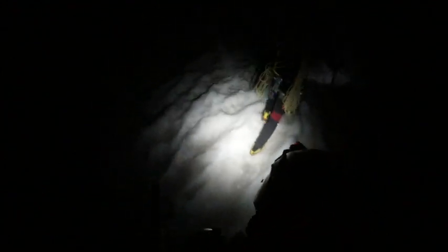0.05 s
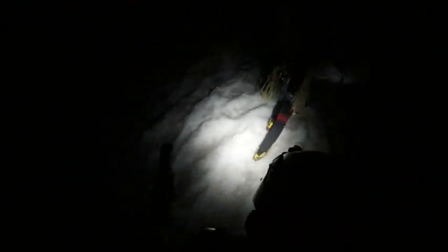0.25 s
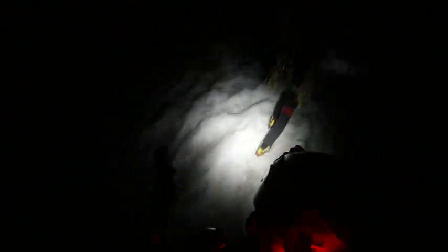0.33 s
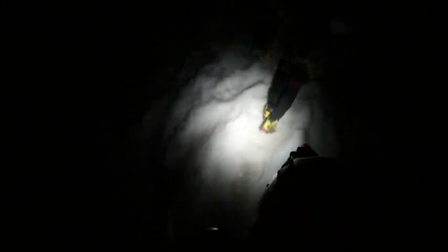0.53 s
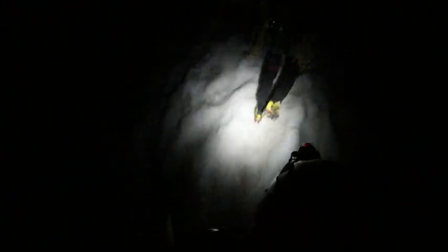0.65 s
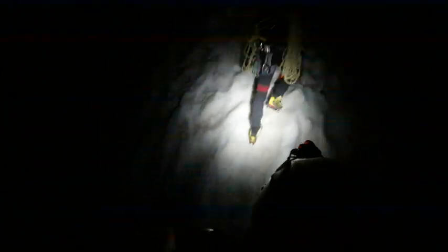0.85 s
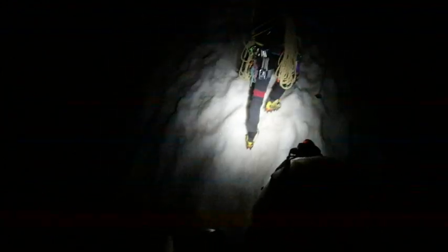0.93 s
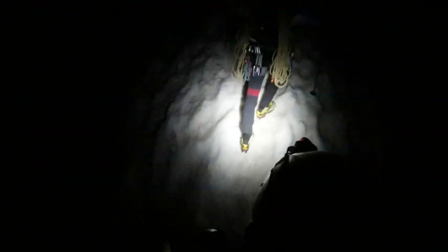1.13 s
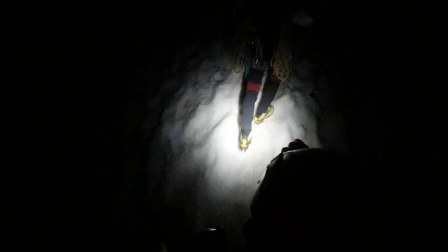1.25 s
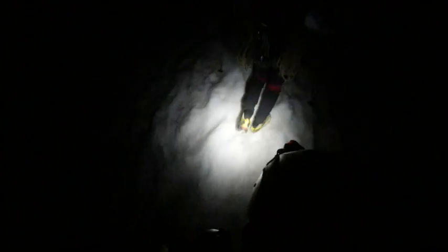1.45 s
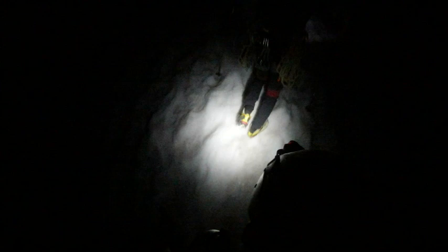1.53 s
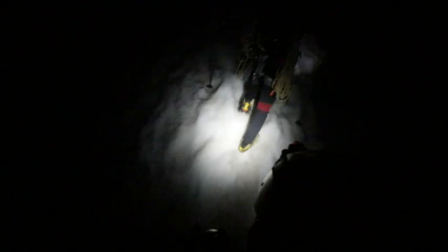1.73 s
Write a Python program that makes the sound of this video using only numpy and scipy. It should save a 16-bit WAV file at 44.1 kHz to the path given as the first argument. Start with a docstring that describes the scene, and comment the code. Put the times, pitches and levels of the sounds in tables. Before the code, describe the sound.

Spiked boots crunch into firm, crusty snow in uneven bursts, with low wind thumps on the microphone

```python
"""On a snow slope at night, spiked boots crunch into firm snow close below a small two-port microphone.
Crunches are bursts of random grain breaks in four sizes, each exciting resonances of its own.
Crust cracks, sole knocks, ice ticks and a stick-slip creak are short rings with noise splinters.
Metal gear clinks on decaying modes, and a thin squeak is a gliding tone roughened by noise. Low thumps,
mostly wind and a few thuds of snow, are short swings with rumble at each port; still air is shaped noise."""
import sys
import numpy as np
from scipy import signal
from scipy.fft import rfft, irfft
from scipy.io import wavfile
from scipy.ndimage import uniform_filter1d, map_coordinates

SR = 44100
rng = np.random.default_rng(int(sys.argv[2]) if len(sys.argv) > 2 else 0)


def digitize_waveform(pressure):
    """Quantize a signal to 16-bit integers and store it at the path in sys.argv[1].

    Rows of a 2-D input are taken as channels; values are limited to [-1, 1].
    """
    field = np.atleast_2d(pressure).T
    bounded = np.clip(field, -1, 1)
    quanta = np.round(bounded * 32767).astype(np.int16)
    wavfile.write(sys.argv[1], SR, quanta)


N = 79380


def undb(db):
    """Logarithmic level: decibels to amplitude gain."""
    return 10 ** (np.asarray(db) / 20)


def unit(x):
    """Normalization: scale to rms 1."""
    return x / np.sqrt(np.mean(x ** 2))


def ring(x, hz, width_hz):
    """Resonance: a band-pass whose Q is centre frequency over bandwidth."""
    b, a = signal.iirpeak(min(hz, 0.45 * SR), hz / width_hz, fs=SR)
    return signal.lfilter(b, a, x)


def add(out, at_s, wave, pan_db=0, lag=0):
    """Interaural-style cues: place a sound by level difference (L-R) and right-port lag in samples."""
    for channel, sign in enumerate((1, -1)):
        start = max(int(at_s * SR - sign * lag / 2), 0)
        out[channel, start:start + len(wave)] += wave[:N - start] * undb(sign * pan_db / 2)


# spectrum of the air noise: (frequency [Hz], relative density level [dB per Hz])
AIR_SPECTRUM = [(15, -42), (25, 22.5), (64, -3.5), (129, -2.5), (433, -4), (826, -6), (2300, -14.5),
                (5280, -26.5), (12800, -35), (15500, -51)]
AIR_DB = -56.5  # rms ahead of the microphone's low cut


def air():
    """Partial coherence: still mountain air is shaped noise, less alike left and right in the treble."""
    hz = np.fft.rfftfreq(N, 1 / SR).clip(1)
    knot_hz, knot_db = np.array(AIR_SPECTRUM).T
    gain = undb(np.interp(np.log(hz), np.log(knot_hz), knot_db))
    mid, side = rfft(rng.standard_normal((2, N))) * gain
    wide = np.clip(hz / 2500, 0.3, 1)
    stereo = irfft(np.array([mid + wide * side, mid - wide * side]), N)
    return undb(AIR_DB) * unit(stereo)


THUMP_SAG = 0.18  # fall in pitch across a thump, as a fraction of its centre frequency
THUMP_EDGE = 0.13  # octave overtone, relative amplitude
THUMP_SPREAD_RAD = 0.63  # random scatter of phase
RUMBLE_DB, RUMBLE_HZ = -15, 74  # level relative to the thump, centre of the band
RUMBLE_S = 0.029  # time for the trailing rumble's power to fall by a factor e
# low thumps at each port: mostly wind; the right-port ones above 190 Hz are low crunch thuds of the snow.
# Length is the full width at about 61 % of the envelope's peak:
# (centre time [s], peak level [dB], frequency at centre [Hz], length [ms])
LEFT_PORT_THUMPS = [(0.19, -37, 88, 15.5), (0.214, -13, 180, 3.7), (0.235, -19, 94, 9.9),
                    (0.251, -20.5, 119, 3.8), (0.268, -25, 74, 5.9), (0.278, -19.5, 133, 7.1),
                    (0.304, -16.5, 90, 19), (0.321, -22.5, 83.6, 13), (0.352, -24.5, 167, 8.4),
                    (0.38, -18.5, 103, 3), (0.4, -31.5, 91, 15), (0.413, -22, 87, 9),
                    (0.423, -14.5, 106, 2.8), (0.442, -16.5, 168, 13), (0.477, -15, 129, 12.6),
                    (0.488, -17, 133.4, 17.5), (0.521, -15, 162, 8.2), (0.533, -14.5, 168, 10.5),
                    (0.546, -22.5, 171, 13), (0.56, -35, 153, 8), (0.612, -30, 145, 3.8),
                    (0.63, -31.5, 117, 5.8), (0.643, -39, 89, 7.4), (0.693, -40, 71, 13),
                    (0.722, -34.5, 100, 7.4), (0.753, -38, 75, 6.9), (0.776, -37, 93, 8.7),
                    (0.815, -37, 106, 6.9), (0.833, -37, 76, 7.9), (0.92, -50, 95, 38),
                    (1.001, -42.5, 81, 25), (1.036, -30.5, 112, 11.3), (1.056, -31, 105.6, 10),
                    (1.088, -38, 122, 37), (1.101, -30.5, 108, 7), (1.112, -28.5, 130, 14),
                    (1.136, -36.5, 118, 14), (1.151, -35.5, 77.5, 16), (1.165, -34, 105, 6.2),
                    (1.184, -33.5, 75, 7.1), (1.197, -32, 109, 19), (1.211, -31.5, 97, 6.7),
                    (1.304, -43, 93, 8.9), (1.324, -39.5, 130, 15), (1.37, -44, 110, 48),
                    (1.472, -41.5, 118, 8.4), (1.496, -36.5, 117, 12), (1.544, -39.5, 71, 14)]
RIGHT_PORT_THUMPS = [(0.26, -43, 161, 12), (0.328, -34, 93, 14), (0.4, -20.5, 135, 3.9),
                     (0.441, -25, 97, 5.1), (0.467, -40, 150, 20), (0.5, -29.5, 54, 5.3),
                     (0.517, -25, 227, 2.9), (0.529, -36, 196, 11), (0.552, -39, 230, 6),
                     (0.588, -38, 198, 4.6), (0.653, -37.5, 80, 65), (0.731, -42.5, 86, 11),
                     (0.786, -42, 67, 20), (0.813, -38.5, 70.5, 14), (0.842, -46.5, 67.4, 59),
                     (1.325, -43.5, 168, 10), (1.434, -39, 140, 3.5), (1.497, -42, 79, 21),
                     (1.545, -39, 57.5, 30), (1.587, -47, 58, 30)]


def low_thumps(table):
    """Pressure pulses at one port: each thump pushes, then sucks, sagging in pitch with rumble behind."""
    t, thumps, power = np.arange(N) / SR, 0, 0
    for (at, db, hz, ms), scatter in zip(table, rng.standard_normal(len(table))):
        since = t - at
        half = ms / 1400  # s from the centre to 1/e of the peak
        sag = 1 - THUMP_SAG * np.tanh(since / half) / 2
        phase = 2 * np.pi * hz * since * sag + THUMP_SPREAD_RAD * scatter
        swings = np.sin(phase) + THUMP_EDGE * np.cos(2 * phase)
        thumps = thumps - undb(db) * np.exp(-(since / half) ** 2) * swings
        fade = np.where(since < 0, half, RUMBLE_S)
        power = power + undb(2 * db) * np.exp(-(since / fade) ** 2)
    noise = rng.standard_normal(N)
    rumble = unit(ring(ring(noise, RUMBLE_HZ, 102), RUMBLE_HZ, 156))
    return thumps + undb(RUMBLE_DB) * np.sqrt(power) * rumble


def mode(hz, db, t60):
    """Modal decay: a sine that falls 60 dB in t60 seconds."""
    t = np.arange(6000) / SR
    return undb(db - 60 * t / t60) * np.sin(2 * np.pi * hz * t)


# modes of two pieces of metal gear: (frequency [Hz], relative level [dB], t60 [s])
BUCKLE_MODES = [(7020, 0, 0.027), (10420, -1.5, 0.04), (12530, -18, 0.079), (14940, -18, .09)]
SPIKE_MODES = [(5100, -8, 0.028), (7800, -10, .02), (9400, 2, 0.014), (14400, -15, .05)]
# blows on each piece: (time [s], level [dB])
BUCKLE_BLOWS = [(.266, -38.5), (0.271, -40.5)]
SPIKE_BLOWS = [(1.2841, -35.5)]
# small pings of gear: (time [s], level [dB], frequency [Hz], t60 [s])
GEAR_PINGS = [(1.455, -51, 3670, 0.085)]


def metal():
    """Modal superposition: a blow on the gear starts all modes of the piece together."""
    out = np.zeros((2, N))
    for modes, blows in ((BUCKLE_MODES, BUCKLE_BLOWS), (SPIKE_MODES, SPIKE_BLOWS)):
        clink = sum(mode(*m) for m in modes)
        for at, db in blows:
            add(out, at, undb(db) * clink, 0, 1)
    for at, db, hz, t60 in GEAR_PINGS:
        add(out, at, mode(hz, db, t60), 1, 2)
    return out


# glide of a thin snow squeak: (time [s], frequency [Hz], rms level of the roughness [dB])
SQUEAK_GLIDE = [(1.325, 6500, -80), (1.33, 6430, -53.5), (1.355, 6630, -53), (1.385, 7200, -59),
                (1.4, 7150, -80)]


def squeak():
    """Amplitude modulation: low-frequency noise multiplies a gliding sine and makes it rough."""
    t = np.arange(N) / SR
    at, hz, db = np.array(SQUEAK_GLIDE).T
    rough = unit(ring(rng.standard_normal(N), 28, 90))
    tone = np.sin(2 * np.pi * np.cumsum(np.interp(t, at, hz)) / SR)
    return undb(np.interp(t, at, db, -140, -140)) * rough * tone


LAG_PER_DB = 1.23  # samples of right-port lag per dB of L-R
SNAP_DIP_RAD = 1.35  # a snap dips briefly before its first peak
SPLINTER_S = 0.0037  # splinter noise falls by a factor e
# splinter peak relative to the ring's envelope peak, dB
CRACK_SPLINTER_DB, KNOCK_SPLINTER_DB, TICK_SPLINTER_DB = -20, -15.5, -11.5


def snaps(table, splinter_db):
    """Damped oscillation: short rings swell and fade within a few cycles, with a burst of splinters."""
    out, t = np.zeros((2, N)), np.arange(1200) / SR
    noises = rng.standard_normal((len(table), len(t)))
    for (at, db, hz, pan_db, cycles), noise in zip(table, noises):
        swell = 1 - np.exp(-t * hz * 4.7 / max(cycles, 1))
        env = swell * np.exp(-t * hz / max(cycles, 0.3))
        tone = env / env.max() * np.sin(2 * np.pi * hz * t - SNAP_DIP_RAD)
        splinters = ring(noise * np.exp(-t / SPLINTER_S), min(1.3 * hz, 9000), 0.78 * hz)
        wave = tone + undb(splinter_db) * splinters / abs(splinters).max()
        add(out, at, undb(db) * wave, pan_db, LAG_PER_DB * pan_db)
    return out


CREAK_S, CREAK_LENGTH_S, CREAK_GAP_S = 1.093, 0.072, 0.0048  # start, length, mean gap between jerks
CREAK_HZ, CREAK_DB, CREAK_CYCLES = 1504, -46, 3.3  # mean ring, mean peak level, decay in cycles


def creak():
    """Stick-slip: the loaded sole slips in small, nearly even jerks."""
    times = np.arange(CREAK_S, CREAK_S + CREAK_LENGTH_S, CREAK_GAP_S)
    jerks = []
    for at in times:
        late, loud, sharp = rng.standard_normal(3)
        jerks.append((at + 0.00101 * late, CREAK_DB + 1.6 * loud,
                      CREAK_HZ * (1 + 0.035 * sharp), -1.5, CREAK_CYCLES))
    return snaps(jerks, CRACK_SPLINTER_DB)


# ice ticks: (time [s], peak level [dB], ring [Hz], L-R [dB], decay by a factor e [cycles])
ICE_TICKS = [(0.018, -36, 5670, 2, 0.82), (0.078, -39.5, 5400, 4, 1.1), (0.1836, -41, 3430, 0, 1.2),
             (0.2485, -28, 3550, -2, 2.5), (0.2521, -34.5, 4000, 0, 2.9), (0.3028, -44, 3800, 0, 1.7),
             (0.3858, -48, 3800, -2, 1.3), (0.3935, -51, 4500, 0, 0.9), (0.4196, -38.5, 6450, 1, 1.3),
             (0.4276, -36.5, 3960, 0.5, 1.7), (0.4479, -41, 3940, -1.5, 0.87),
             (0.4624, -36.5, 3530, 0.5, 0.82), (0.4825, -42, 5200, 4, 1), (0.527, -39, 2980, -2, 1.1),
             (0.5538, -33, 2570, 4, 2.7), (0.5915, -34.5, 2800, -3, 1.5), (0.6523, -45, 2900, 2, 1.8),
             (0.722, -36, 4540, 5, 5.4), (0.7243, -35, 4960, 5.5, 4), (0.7264, -36, 4940, 5.5, 4.8),
             (0.7308, -37, 4570, 4, 4), (0.7548, -44, 3500, 0, 1.5), (0.7805, -37, 4500, 4, 1.4),
             (0.8789, -44, 4480, 4.5, 0.84), (0.942, -49, 5620, 5, 1.3), (0.975, -47, 5210, 11, 0.96),
             (1.0268, -42, 5100, 10.5, 0.89), (1.1063, -41, 4300, 8, 3), (1.1158, -37.5, 4370, 12.5, 7.4),
             (1.1213, -42, 4000, 10, 2.8), (1.13, -44, 4870, 6.5, 3), (1.1872, -46, 4500, -2.5, 1),
             (1.24, -34, 5040, 3.5, 0.9), (1.3, -37, 2640, -3, 1.6), (1.4056, -40, 3750, 5, 1.2),
             (1.4858, -38.5, 3500, 5, 2), (1.5418, -46, 3550, 3, 1.9), (1.5565, -47, 3720, -2.5, 2.4),
             (1.5768, -44, 3340, -2, 3.3), (1.6709, -34.5, 2620, 6, 0.54), (1.6714, -39, 7200, 3, 1.5),
             (1.6832, -34.5, 3550, 5, 2.6), (1.6906, -34.5, 3330, -3, 1.2), (1.722, -47, 5230, 4.5, 1.4),
             (1.7457, -50, 5210, 5.5, 1.4)]


def ticks():
    """Small resonators ring high: ice ticks with the strongest splinters."""
    return snaps(ICE_TICKS, TICK_SPLINTER_DB)


# dull knocks of the sole: (time [s], peak level [dB], ring [Hz], L-R [dB], decay by a factor e [cycles])
SOLE_KNOCKS = [(0.144, -38, 397, -2, 1.3), (0.231, -32, 332, 21.5, 1.02), (0.249, -38, 382, 22, 0.83),
               (0.295, -36.5, 310, 24, 2.2), (0.3653, -23.5, 520, 1.5, 0.58), (0.397, -36, 404, -11, 2),
               (0.426, -34, 475, 7, 1.7), (0.447, -32.5, 570, 6, 1.7), (0.4718, -34, 500, -4, 1),
               (0.5003, -33.5, 540, 2, 1.2), (0.514, -36, 563, 6, 0.62), (0.5207, -27.5, 604, 3, 1.4),
               (0.5488, -26, 570, 2, 1.16), (0.585, -35.5, 463, 3, 1.8), (1.044, -39, 445, 1, 3.8),
               (1.055, -37.5, 410, -6, 1.7), (1.2165, -35, 610, 0, 1.9), (1.225, -28.5, 620, 3, 1),
               (1.2295, -26, 500, -2, 1.4), (1.235, -31.5, 605, 1, 1), (1.2415, -20, 560, -1.5, 0.66),
               (1.288, -36, 560, -1, 2.5), (1.321, -36, 437, -1.5, 1.6), (1.339, -40, 584, 1, 2.3),
               (1.373, -39, 630, 0, 2.2), (1.413, -44.5, 500, 1, 3.1)]


def knocks():
    """Heavily damped low resonance: dull knocks of the sole."""
    return snaps(SOLE_KNOCKS, KNOCK_SPLINTER_DB)


# crust cracks: (time [s], peak level [dB], ring [Hz], L-R [dB], decay by a factor e [cycles])
CRUST_CRACKS = [(0.1269, -36.5, 1440, -0.5, 2.8), (0.1798, -55, 1410, -8, 1.4), (0.2118, -33, 1510, 0, 1.8),
                (0.2603, -33.5, 1800, 0, 2.6), (0.2885, -38.5, 1960, -4.5, 3.9),
                (0.2938, -37.5, 1340, 0, 1.7), (0.3015, -37, 930, 0, 1.7), (0.3235, -39, 1300, 1, 1),
                (0.3404, -27.5, 1230, -1, 0.63), (0.3654, -29, 1200, 2.5, 0.45), (0.3755, -32, 1150, 3, .8),
                (0.41, -27.5, 1400, -4, 1.1), (0.4289, -44, 1220, -7, 1.7), (0.45, -35, 1350, -11, 1.3),
                (0.4732, -34, 2200, -2, 0.99), (0.5014, -44, 890, -18, 0.97), (0.5645, -33, 1360, 4, 2.7),
                (0.5863, -34.5, 1280, -5, 2.4), (0.653, -38, 1180, 2, 1.2), (0.6709, -34.5, 1390, -3, 1.05),
                (0.6905, -38.5, 1380, -0.5, 0.9), (0.7228, -38.5, 1500, 0, 4),
                (0.7325, -35.5, 1470, -2.0, 2.9), (0.8711, -48, 1010, -4, 1.1),
                (0.9619, -42, 2090, 4.5, 1.5), (1.027, -51, 1270, 5, 1.5), (1.047, -38, 1340, -3, 5.8),
                (1.186, -41, 1000, -2, 0.65), (1.2255, -33, 1530, -3, 3.8),
                (1.2388, -31.5, 1830, -2.5, 3.1), (1.2432, -27, 1740, -7, 2.7),
                (1.289, -42, 904, -3.0, 1.6), (1.319, -30, 1410, 0, 0.68), (1.3252, -35, 1200, -4, 0.82),
                (1.3412, -30.5, 1690, -3.5, 1.8), (1.3835, -40, 1480, 0, 2), (1.3774, -30, 1640, -3.5, 1.9),
                (1.4136, -33.5, 1870, -4, 1.8), (1.4394, -32.5, 1780, -5.5, 1.9),
                (1.5417, -40, 1760, -1, 1.5), (1.5443, -24, 1696, -3, 2.6),
                (1.5554, -30.5, 1740, -4.0, 1.9), (1.5751, -36, 1620, -5, 2),
                (1.5827, -37.5, 1500, -9.5, 1.1), (1.5916, -42, 1640, -5, 1.6), (1.683, -45, 1290, -3, 1.1)]


def cracks():
    """Brittle fracture: the crust cracks with a short mid-frequency ring."""
    return snaps(CRUST_CRACKS, CRACK_SPLINTER_DB)


LARGEST = 1.46  # cap on the exponentially distributed grain size, in units of its uncapped mean


def grains(rate, scatter_db, rings):
    """Shot noise: random breaks of uneven size and sign, each ringing one resonance."""
    out = 0
    for hz, width, db in rings:
        chance, polarity, draw = rng.random((3, N))
        size = np.minimum(-np.log(1 - draw), LARGEST)
        breaks = chance < rate / len(rings) / SR
        hits = breaks * np.sign(polarity - 0.5) * undb(scatter_db * size)
        out = out + undb(db) * unit(ring(ring(hits, hz, width), hz, 2 * width))
    return unit(out)


ATTACK_S, RELEASE_S = 0.0095, 0.011  # linear rise; fall by a factor e
CLUMP_HZ, CLUMP_DB = 151, 1.5  # fastest swing of the shared level, its rms scatter
# bursts of breaking snow: (start [s], length [s], coarse, medium, fine, finest grain levels [dB],
# right-port lag [samples], L-R [dB])
SNOW_CRUNCHES = [(0.111, 0.046, -47.5, -49.5, -48, -55, 4, 1.5),
                 (0.17, 0.021, -52.5, -50, -54.5, -67, 4.5, 1.5),
                 (0.205, 0.066, -47, -49.5, -50, -57, -3.5, -2),
                 (0.22, 0.043, -46.5, -49, -45.5, -62, 2, -2.5),
                 (0.259, 0.066, -47, -52, -56.5, -64, 3, 0.5), (.33, 0.18, -50, -54.5, -57.5, -68, 4, 0.5),
                 (0.512, 0.021, -45, -48, -50, -62, -1, -2.5),
                 (0.544, 0.017, -43, -43, -42.5, -57, -3.5, -1),
                 (0.577, 0.0095, -42, -44.5, -45.5, -61, 1, -0.5),
                 (0.616, .09, -55.5, -58.5, -63.5, -71.5, 6, 0.5),
                 (0.714, 0.018, -51, -41, -45, -63.5, 7.5, 4),
                 (0.732, 0.029, -52.5, -52, -59.5, -69, 7, 2.5),
                 (0.762, 0.29, -63.5, -65, -67, -74, 5.5, 0.5),
                 (1.035, 0.026, -42, -48.5, -45.5, -50.5, 1.5, 3),
                 (1.07, 0.087, -51, -59, -55.5, -66.5, 3.5, 0.5),
                 (1.112, 0.026, -49, -67, -53, -67, 8, 0.5), (1.163, 0.12, -58, -64, -58.5, -66, 4.5, 2),
                 (1.21, 0.027, -42.5, -43.5, -48.5, -52, 2, -1),
                 (1.224, 0.019, -38, -39.5, -47, -56, -1.5, -0.5),
                 (1.254, 0.05, -47.5, -53, -52.5, -59, 6, 2), (1.284, .11, -48, -48.5, -50, -58.5, 3, 1),
                 (1.395, 0.087, -54.5, -58, -58, -64, 1.5, 1), (1.45, 0.0076, -64, -72, -50, -74, 6, -0.5),
                 (1.486, 0.036, -62, -64, -65, -72, -5, 1), (1.528, 0.06, -54, -54.5, -61, -68.5, -1.5, 0),
                 (1.596, 0.065, -75, -69, -72, -72.5, 3, -1), (1.675, 0.01, -71, -57, -60, -63, 11, 4),
                 (1.715, 0.068, -76, -65.5, -65.5, -68.5, 8, 2)]
# grain sizes, coarse to finest: (rate [grains/s], level scatter [dB per unit of size],
# scattered amplitude share [0-1], [(ring [Hz], width of the first of two filters [Hz], relative level [dB])])
GRAIN_SIZES = [(730, 3.2, 0.11, [(292, 282, 5.5), (454, 320, -4), (625, 187, -3), (862, 270, 0)]),
               (651, 2.6, 0.24, [(1300, 540, -0.5), (1453, 610, 1), (1790, 290, -2), (2090, 970, 0.5)]),
               (1548, 2.9, 0.73, [(2700, 840, 5), (3650, 1200, 3.5), (4860, 1630, 4.5),
               (6050, 2500, -2.5)]), (5420, 3.1, 1, [(6950, 3900, 6.5), (9620, 2900, 2), (11300, 1900, 0),
               (14100, 2000, -10)])]
# the housing shades the ports unevenly, one entry per grain size: (L-R [dB])
HOUSING_SHADE = [-1, -3, 1, 1]


def crunch():
    """Superposed fracture bursts: each rises, holds and dies; some grains arrive from scattered places."""
    t, rows, out = np.arange(N) / SR, np.array(SNOW_CRUNCHES, float), 0
    since = t - rows[:, :1]
    rise = np.clip(since / ATTACK_S, 0, 1)
    shape = rise * np.exp(-np.clip(since - rows[:, 1:2], 0, None) / RELEASE_S)
    # the latest burst to start sets the direction
    latest = np.searchsorted(rows[:, 0], t).clip(1) - 1
    lag, pan_db = (uniform_filter1d(rows[latest, k], size=200) for k in (6, 7))
    b, a = signal.butter(2, CLUMP_HZ, fs=SR)
    slow = unit(signal.lfilter(b, a, rng.standard_normal(N)))
    clumps = unit(undb(CLUMP_DB * slow))  # grains of all sizes give way together
    for k, (rate, scatter_db, share, rings) in enumerate(GRAIN_SIZES):
        env = np.sqrt(undb(2 * rows[:, 2 + k]) @ shape ** 2)  # bursts add in power
        spot, left, right = (grains(rate, scatter_db, rings) for _ in range(3))
        late = map_coordinates(spot, [np.arange(N) - lag], mode="mirror")
        share = np.clip(share, 0, 1)
        shade = undb(HOUSING_SHADE[k] * np.array([[0.5], [-0.5]]))
        direct = np.sqrt(1 - share ** 2) * np.array([spot, late])
        scattered = share * np.array([left, right])
        out = out + env * shade * (direct + scattered)
    return out * clumps * undb(np.array([pan_db, -pan_db]) / 2)


def scene():
    """Linear superposition: air, low thumps, gear and snow add as pressures."""
    thumps = np.array([low_thumps(LEFT_PORT_THUMPS), low_thumps(RIGHT_PORT_THUMPS)])
    gear = metal()
    snow = squeak() + creak() + ticks() + knocks() + cracks() + crunch()
    return air() + thumps + gear + snow


def record(dry):
    """Band limiting: the microphone drops the deep bass; the recorder cuts the top."""
    low_cut = signal.butter(2, 62.5, "high", fs=SR, output="sos")
    top_cut = signal.ellip(8, 0.2, 70, 15600, fs=SR, output="sos")
    return signal.sosfilt(top_cut, signal.sosfilt(low_cut, dry))


dry = scene()
out = record(dry)
digitize_waveform(out)
```